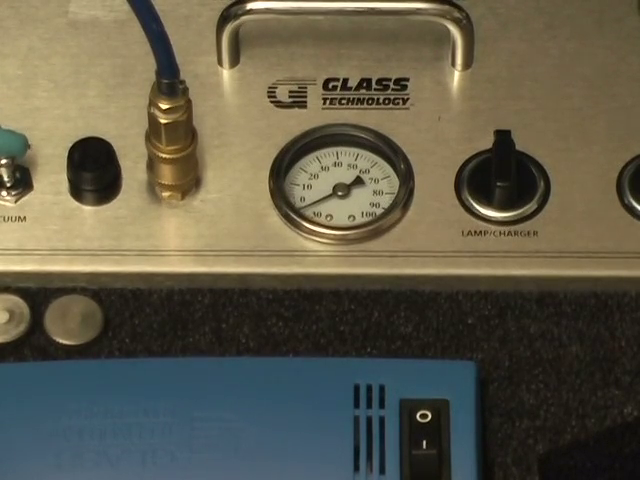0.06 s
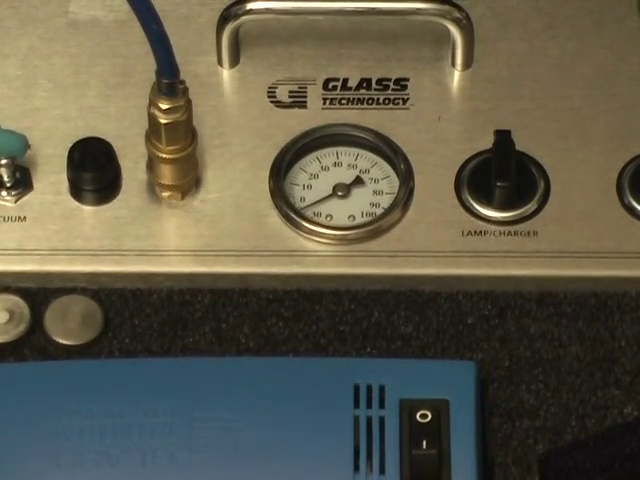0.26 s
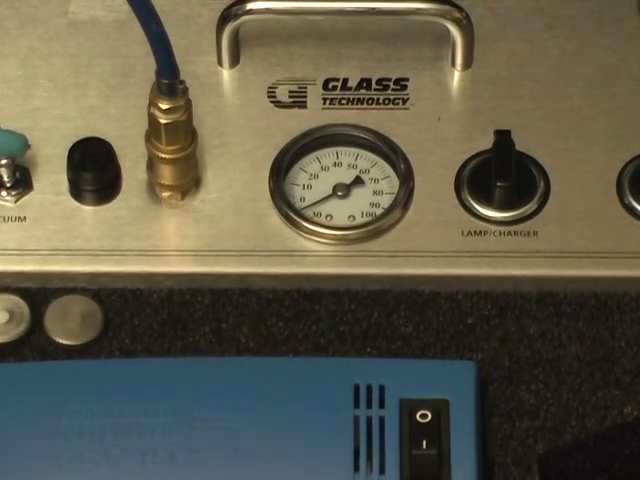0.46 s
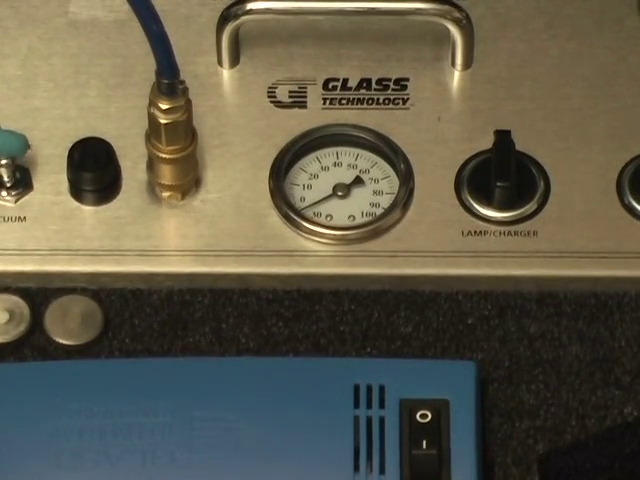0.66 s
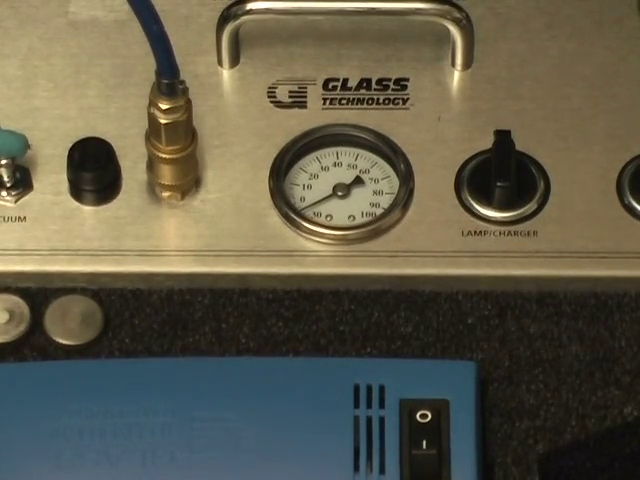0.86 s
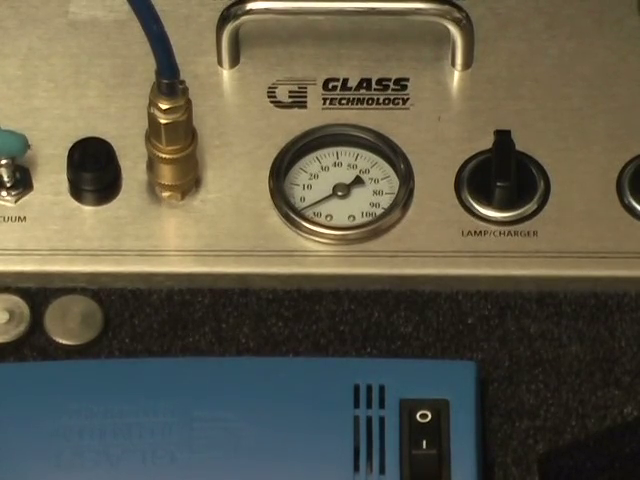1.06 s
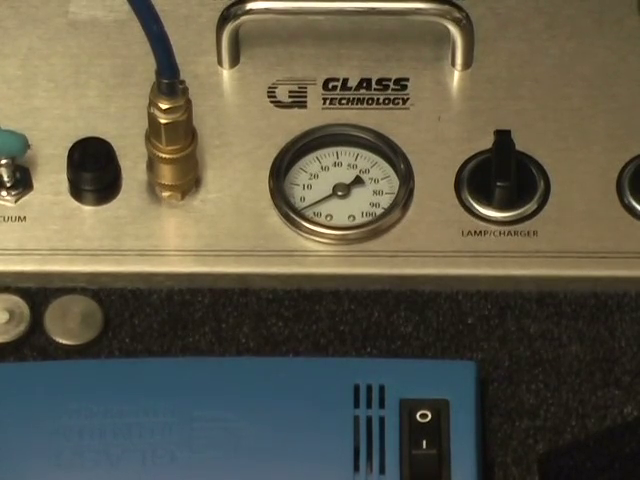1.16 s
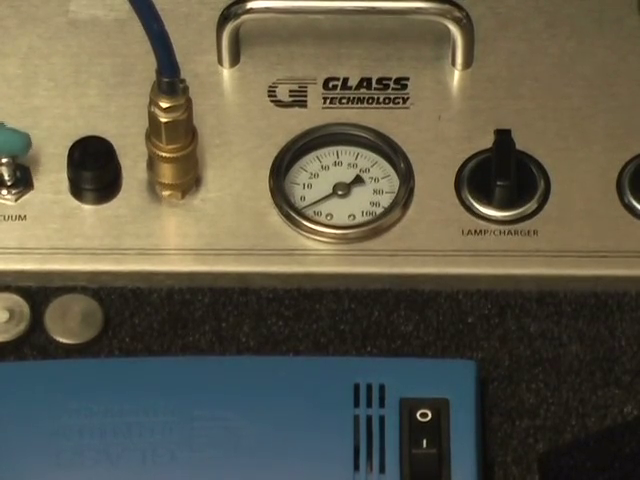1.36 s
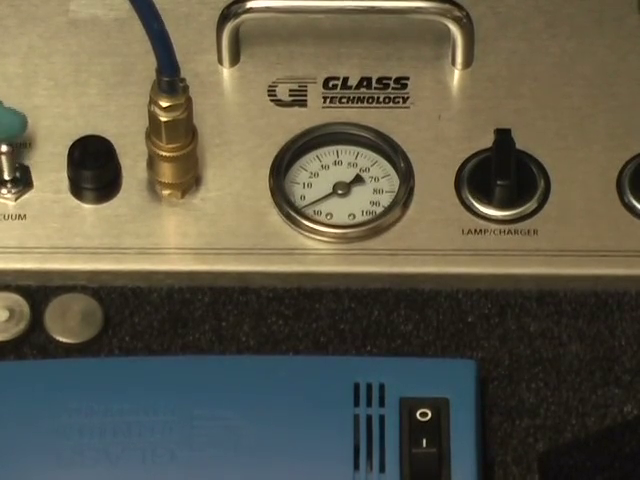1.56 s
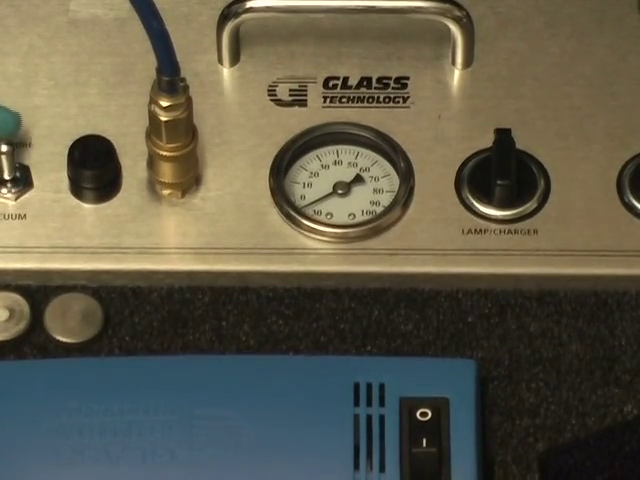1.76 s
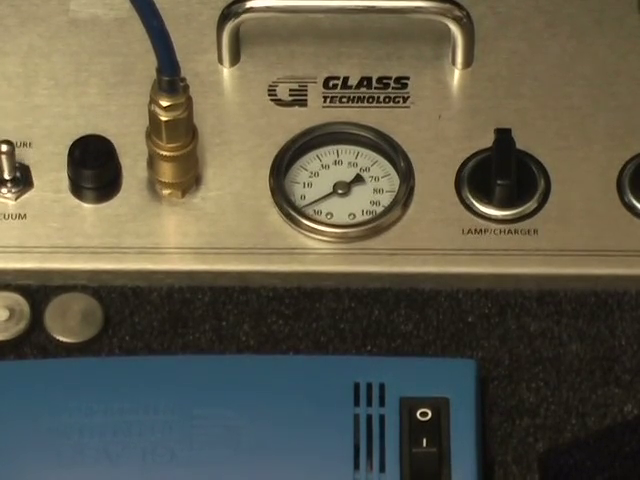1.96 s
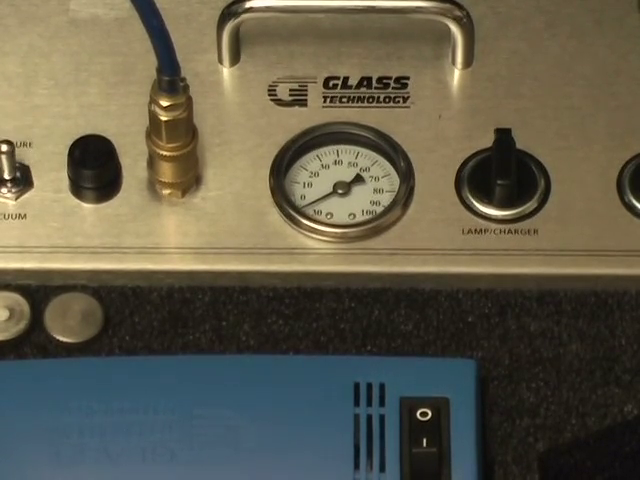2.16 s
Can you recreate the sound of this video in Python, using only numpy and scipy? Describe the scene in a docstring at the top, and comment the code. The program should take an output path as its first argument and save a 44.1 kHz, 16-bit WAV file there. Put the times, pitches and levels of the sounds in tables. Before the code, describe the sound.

A small electric vacuum pump hums close by with a fast valve clatter and thin airy hiss, until a toggle switch snaps, the motor judders to a stop, and faint fan hum remains in the room.

```python
"""A room with a small diaphragm vacuum pump in a metal case, heard from close by through two microphone ports.
Strokes hum as harmonics of the shaft; two valve slaps a turn, one weaker, ring the housing; air hisses and whistles.
A toggle switch snaps as bursts of noise over ringing panel tones. The motor coasts to rest with a judder
and a few last ticks of noise, and a hand brushes the lever.
A fan motor and mains hum, steady tones over quiet noise, remain in the room."""
import sys
import numpy as np
from scipy import signal
from scipy.fft import rfft, irfft, next_fast_len
from scipy.io import wavfile
from scipy.ndimage import map_coordinates

SR = 44100
rng = np.random.default_rng(int(sys.argv[2]) if len(sys.argv) > 2 else 0)


def dump(signal):
    """Clip the signal to [-1, 1] and save it as 16-bit WAV at the path in sys.argv[1]."""
    limited = np.clip(np.atleast_2d(signal).T, -1, 1)
    pcm = np.round(limited * 32767).astype(np.int16)
    wavfile.write(sys.argv[1], SR, pcm)


def undo_db(level):
    """Turn decibels back into plain size, where 20 dB means ten times bigger."""
    steps = np.asarray(level, float) / 20
    return 10 ** steps


N = 97240
T = np.arange(N) / SR
OFF_S = 1.426  # the switch cuts the power


def unit(x):
    """Scale to rms 1."""
    return x / np.sqrt(np.mean(x ** 2) + 1e-20)


def over_time(points):
    """Straight lines through (s, value) points."""
    return np.interp(T, *np.transpose(points))


def along(points, hz):
    """(Hz, value) points joined on a log frequency axis."""
    f, v = np.transpose(points)
    return np.interp(np.log(hz + 1), np.log(f + 1), v)


def wobble(rate):
    """A smooth random curve with rate knots a second, at most 40."""
    knots = rng.standard_normal(int(N * 40 / SR) + 4)
    return map_coordinates(knots, [T * min(rate, 40)])


def filtered(x, response):
    """x passed through a complex response of frequency."""
    m = next_fast_len(N + SR // 2)
    return irfft(rfft(x, m) * response(np.fft.rfftfreq(m, 1 / SR)), m)[..., :N]


def colour(points):
    """Zero-phase gain of a (Hz, dB) table."""
    return lambda hz: undo_db(along(points, hz))


def resonances(table):
    """Causal sum of band resonances with alternating sign."""
    def response(f):
        total = 0
        for k, (centre, width, db) in enumerate(table):
            damping = 1j * f * width
            total = total + (-1) ** k * undo_db(db) * damping / (centre * centre - f * f + damping)
        return total
    return response


def twice(table):
    """The resonances passed through twice: steeper, with each level in dB doubled."""
    return lambda f: resonances(table)(f) ** 2


def noise(response):
    """Coloured noise of rms 1."""
    return unit(filtered(rng.standard_normal(N), response))


def burst(start, t60, hold=0):
    """Envelope that jumps up, holds and dies by 60 dB in t60 seconds."""
    return (T >= start) * undo_db(-60 * np.clip(T - start - hold, 0, 1) / t60)


# steady tones of fan and mains: pitch_hz [Hz], level_db [dB rms]
HUM = [(57.3, -76.5), (120, -76), (240, -62.5), (286, -69.5), (360, -65), (401, -64), (458, -66.5),
       (516, -64.5), (573, -72.5), (1031, -74)]
# faint noise bands, passed twice: centre_hz [Hz], width_hz [Hz], level_db [relative dB]
WHINE = [(5650, 350, -6), (7550, 250, 0), (9300, 350, -7)]
# quiet room noise: pitch_hz [Hz], level_db [relative dB per Hz]
FLOOR = [(18, -41), (30, -20), (187, -6), (237, -7), (308, -21), (370, -3.5), (731, -14), (1030, -15.5),
         (1480, -20.5), (7510, -24), (15600, -34.5)]


def background():
    """Fan and mains tones waver slightly over quiet room noise."""
    waver_db, waver_rate, whine_db, floor_db = .9, 9.86, -78, -62
    hum = 0
    for hz, db in HUM:
        tone = np.sqrt(2) * np.sin(2 * np.pi * (hz * T + rng.random()))
        hum = hum + undo_db(db + waver_db * wobble(waver_rate)) * tone
    return hum + undo_db(whine_db) * noise(twice(WHINE)) + undo_db(floor_db) * noise(colour(FLOOR))


def tail(t60s):
    """A noise tail of energy 1, each frequency dying at its own speed."""
    hz, t, z = signal.stft(rng.standard_normal(SR), SR, nperseg=256)
    h = signal.istft(z * undo_db(-60 * t / along(t60s, hz)[:, None]), SR, nperseg=256)[1]
    return h / np.linalg.norm(h)


# decay of the room: pitch_hz [Hz], t60_s [s]
ROOM_DECAY = [(200, 0.76), (1000, 1), (4000, 0.58), (12000, 0.24)]
# gain of the room echo: pitch_hz [Hz], level_db [dB]
ROOM_GAIN = [(60, -28), (300, -25), (700, -19), (1500, -16), (4000, -12), (12000, -14)]


def room_echo(machine):
    """Reflections of the machine as a noise tail, already sounding at the start."""
    lead_in = np.concatenate([machine[SR // 2::-1], machine])  # the first half second reversed, ahead
    echo = signal.fftconvolve(lead_in, tail(ROOM_DECAY))[SR // 2 + 1:][:N]
    return filtered(echo, colour(ROOM_GAIN))


# brushes of the hand on the lever: start_s [s], level_db [dB at the peak], hold_s [s]
BRUSHES = [(1.826, -66, 0.0071), (1.840, -54.5, .002), (1.8435, -56.5, 0.0036), (1.850, -67, 0.0074),
           (1.863, -64, 0.0018), (1.91, -49, 0.001), (1.916, -65, 0.0087), (1.93, -65, 0.0034),
           (1.936, -56, 0.0034)]
# colour of the brushes: pitch_hz [Hz], level_db [relative dB per Hz]
BRUSH = [(880, -44), (1500, -3), (2780, -9), (5980, 1), (7280, -3), (9120, -1), (15600, -16)]


def hand():
    """The hand brushes the lever: short held bursts of friction noise."""
    fade_t60 = .016  # s
    envelope = sum(undo_db(db) * burst(s, fade_t60, hold) for s, db, hold in BRUSHES)
    return envelope * noise(colour(BRUSH))


# last ticks of the coasting pump: start_s [s], level_db [dB at the peak]
TICKS = [(1.5165, -44), (1.5465, -47), (1.549, -43), (1.5815, -55), (1.640, -50.5), (1.692, -51),
         (1.7737, -60)]
# colour of the ticks: pitch_hz [Hz], level_db [relative dB per Hz]
TICK = [(500, -50), (1000, 0), (2200, 5), (4000, -1), (6100, 4), (7700, -25), (9700, -3), (12000, -20),
        (15600, -32)]


def last_ticks():
    """Small ticks of the coasting pump: sharp bursts of noise that die fast."""
    tick_t60 = .025  # s
    return sum(undo_db(db) * burst(s, tick_t60) for s, db in TICKS) * noise(colour(TICK))


# contacts of the toggle: start_s [s], level_db [dB at the peak]
CONTACTS = [(1.4257, -33), (1.4273, -31), (1.429, -33), (1.4309, -30), (1.436, -37)]
# colour of the snap: pitch_hz [Hz], level_db [relative dB per Hz]
SNAP = [(290, -23), (500, -4), (1780, -8), (2820, -3), (3870, -12.5), (5080, 2.5), (7180, -6),
        (12400, -10.5), (15600, -10)]
# ringing of the panel: pitch_hz [Hz], level_db [relative dB], t60_s [s]
PANEL = [(988, -5, 0.15), (1027, -1, 0.17), (1450, -3, 0.18), (2832, 5, 0.05), (4370, 4, 0.035),
         (5367, 3.5, 0.047)]
# the case ringing on, passed twice: centre_hz [Hz], width_hz [Hz], level_db [relative dB]
AFTER = [(4750, 200, -4), (5320, 150, -2), (5760, 200, 0)]
# one faint high ping: start_s [s], pitch_hz [Hz], level_db [dB at the peak], t60_s [s]
PING = (1.507, 14500, -66, .08)


def switch():
    """The toggle snaps over in several contacts, rings the panel, and the case rings on."""
    contact_t60, snap_t60, snap_hold, after_t60 = .009, .13, .0075, .3  # s
    snap_db, panel_db, after_db = -40.5, -41, -48
    contacts = sum(undo_db(db) * burst(s, contact_t60) for s, db in CONTACTS)
    body = undo_db(snap_db) * burst(OFF_S, snap_t60, snap_hold)
    snap = (contacts + body) * noise(colour(SNAP))
    panel = sum(undo_db(db) * burst(OFF_S, t60) * np.sin(2 * np.pi * hz * T) for hz, db, t60 in PANEL)
    after = undo_db(after_db) * burst(OFF_S, after_t60) * noise(twice(AFTER))
    s, hz, db, t60 = PING
    ping = undo_db(db) * burst(s, t60) * np.sin(2 * np.pi * hz * T)
    return snap + undo_db(panel_db) * panel + after + ping


# shaft speed under power: start_s [s], speed_hz [turns per second]
SPEED = [(0, 67.43), (.2, 67.45), (.45, 67.68), (1.43, 67.72)]


def shaft():
    """Share of full speed, braking late to rest, and turns counted from one valve slap."""
    slap_at_s, coast_s, late_braking = .845, .26, 2.2
    share = 1 - np.clip((T - OFF_S) / coast_s, 0, 1) ** late_braking
    turns = np.cumsum(share * over_time(SPEED)) / SR
    return share, turns - turns[round(slap_at_s * SR)]


# air through the valves: pitch_hz [Hz], level_db [relative dB per Hz]
AIR = [(24, -63), (40, -23), (150, -25), (203, -10), (343, -2.5), (429, -9), (1920, -17), (2290, -22),
       (3400, -18.5), (3950, -20.5), (4500, -17), (5210, -18), (6050, -16), (8500, -21), (11300, -28),
       (12200, -37), (15600, -39)]
# air whistling in the valve, passed twice: centre_hz [Hz], width_hz [Hz], level_db [relative dB]
WHISTLE = [(5750, 450, -14), (6250, 200, -11), (7850, 200, -18)]
# added level of the whistle: start_s [s], level_db [dB]
WHISTLE_SWELL = [(0, -0.5), (.4, 2.1), (1, 1), (1.3, 4), (1.45, 5)]
# thin tones in the whistle: pitch_hz [Hz], level_db [dB at the peak, before swell and pulse]
PIPE = [(6196, -59), (6214, -60), (6285, -63)]


def valve_air(share, turns):
    """Air hisses and whistles through the valves, pulsing once a turn and falling with the speed."""
    whistle_db, whistle_pulse_db, pipe_pulse_db, pipe_waver_db = -53.5, 5, 5, 2
    air_db, air_pulse_db, speed_power = -46.5, -.5, 16
    beat = np.cos(2 * np.pi * (turns - .08))
    swell_db = over_time(WHISTLE_SWELL)
    whistle = undo_db(whistle_db + swell_db + whistle_pulse_db * beat) * noise(twice(WHISTLE))
    pipe = 0
    for hz, db in PIPE:
        tone = np.sin(2 * np.pi * (hz * T + .2 * wobble(15)))  # pitch wanders slightly
        pipe = pipe + undo_db(db + pipe_waver_db * wobble(8)) * tone
    pipe = undo_db(swell_db + pipe_pulse_db * beat) * pipe
    air = undo_db(air_db + air_pulse_db * beat) * noise(colour(AIR))
    return share ** speed_power * (whistle + pipe + air)


# force of the valve slap: start_s [s], ring_db [dB before a trim], seat_db [dB before a trim]
SLAP = [(0, -58, -60), (.15, -58, -59), (.19, -54.5, -58), (.5, -53.5, -57), (.85, -54.5, -56),
        (1.1, -55.5, -55), (1.25, -57, -54.5), (1.42, -56.5, -55.5)]
# colour of the bright ring: pitch_hz [Hz], level_db [relative dB]
SLAP_COLOUR = [(2150, -13), (2600, 18), (4000, -14.5), (6000, -7), (8000, -3.5), (11000, -4), (13500, -17),
               (16000, -43)]
# valve housing resonances: centre_hz [Hz], width_hz [Hz], level_db [relative dB]
HOUSING = [(4750, 240, 3.5), (6400, 310, 2.5), (7350, 350, 0), (8290, 330, 3.5), (10100, 520, -1.5),
           (11240, 550, -4.5), (13500, 610, -2)]
# valve seat, passed twice: centre_hz [Hz], width_hz [Hz], level_db [relative dB]
SEAT = [(3320, 740, -5), (3710, 390, -5.5)]
# part rung evenly by each slap, passed twice: centre_hz [Hz], width_hz [Hz], level_db [relative dB]
COLLAR = [(5850, 300, 0)]


def valve_slaps(share, turns):
    """Two slaps a turn, as noise bursts and one click, ring the housing and the duller seat."""
    slap_t60, tail_t60, tail_db = .01, .05, -19  # s, s, dB
    second_turn, second_db = .42, -7  # the weaker slap
    evenness_db, jitter_s, speed_power = 1.1, .00003, 37
    knock_db, ring_trim_db, seat_trim_db, collar_db = 6, 4, -1.1, -62
    whole = np.floor(turns).astype(int)
    chance = rng.standard_normal((200, 3))[whole + 80]  # drawn anew each turn
    size = undo_db(evenness_db * chance)
    age, second_age = np.array([turns % 1, (turns - second_turn) % 1]) / SPEED[-1][1]  # s at full speed
    first = undo_db(-60 * age / slap_t60) + undo_db(tail_db - 60 * age / tail_t60)
    second = undo_db(second_db - 60 * second_age / slap_t60)
    gate = size[:, 0] * first + size[:, 1] * second

    hits = np.flatnonzero(np.diff(whole, prepend=whole[0]))
    jittered = np.abs(hits + np.round(jitter_s * SR * chance[hits, 2])).astype(int)
    knock = np.bincount(jittered, size[hits, 0], N)[:N]
    force = unit(gate * rng.standard_normal(N)) + undo_db(knock_db) * unit(knock)

    s, ring_db, seat_db = np.transpose(SLAP)
    ring = unit(filtered(force, lambda f: resonances(HOUSING)(f) * colour(SLAP_COLOUR)(f)))
    ring = ring * undo_db(np.interp(T, s, ring_db) + ring_trim_db)
    seat = unit(filtered(force, twice(SEAT))) * undo_db(np.interp(T, s, seat_db) + seat_trim_db)
    even = np.bincount(hits, size[hits, 2], N)
    collar = undo_db(collar_db) * unit(filtered(even, twice(COLLAR)))
    return share ** speed_power * (ring + seat + collar)


# shaft orders at full speed: order [multiple of shaft speed], level_db [relative dB]
STROKE = [(1, -19.5), (2, -19), (3, -1), (4, -2.5), (5, -3.5), (6, -17), (7, -13), (8, -12), (9, -20.5),
          (10, -18), (11, -14.5), (12, -22), (13, -12), (14, -13), (15, -23), (16, -14.5), (17, -21.5),
          (18, -27), (19, -14), (20, -17), (21, -21), (22, -23), (23, -27), (24, -23), (25, -21), (26, -34),
          (27, -19), (28, -36), (29, -31), (30, -17), (31, -33), (32, -23.5), (33, -38)]
# orders that differ before the vacuum settles: order [multiple of shaft speed], level_db [added dB]
EARLY = [(6, 3), (7, 4), (8, -3), (10, 4), (11, -5), (17, 4), (19, 2), (20, 6), (21, 4), (27, -13)]
# stroke force while coasting: start_s [s], level_db [dB under full load]
COASTING = [(1.42, 0), (1.475, -1.5), (1.5, -6), (1.54, -15), (1.58, -17), (1.63, -25), (1.7, -36)]
# buzz of the case, passed twice: centre_hz [Hz], width_hz [Hz], level_db [relative dB]
RATTLE = [(365, 29, 3), (224, 13, 1)]
# rough shaking after switch-off: pitch_hz [Hz], level_db [relative dB per Hz]
JUDDER = [(40, -24), (70, -3), (160, -13), (350, 4.5), (1000, -8), (2200, -13), (5000, -37)]


def order_lag(k):
    """Phase of an order in turns: the low ones lock into a thump, the highest fall at random."""
    if k <= 5:
        return .115 * k * k
    if k <= 21:
        return .102 * k * k + .44 * k + .21
    return rng.random()


def strokes(share, turns):
    """Shaft orders; while coasting they slide through the fixed response of the case, which buzzes and judders."""
    stroke_db, stroke_turn, settle_s = -40, .519, .5
    waver_db, waver_rate, coast_waver_db, break_up_s = .74, 13.8, 3, .07
    buzz_db, judder_db, judder_t60, judder_hold, judder_rise = -52.5, -43.5, .81, .073, .03  # dB, then s
    order, order_db = np.transpose(STROKE)
    early = dict(EARLY)
    waver = waver_db + coast_waver_db * np.clip((T - OFF_S) / break_up_s, 0, 1)
    unsettled = np.clip(1.5 - 1.5 * T / settle_s, 0, 1)
    tones = 0
    for k in range(1, 60):
        case_db = np.interp(k * share, order, order_db)
        level_db = case_db + early.get(k, 0) * unsettled + waver * wobble(waver_rate)
        tones = tones + undo_db(level_db) * np.cos(2 * np.pi * (k * (turns - stroke_turn) + order_lag(k)))
    hum = -undo_db(stroke_db) * np.sqrt(2) * tones
    buzz = undo_db(buzz_db + 2.0 * wobble(12.1)) * noise(twice(RATTLE))
    rise = np.clip((T - OFF_S) / judder_rise, 0, 1) * burst(OFF_S, judder_t60, judder_hold)
    judder = undo_db(judder_db + 1.5 * wobble(34.86)) * rise * noise(colour(JUDDER))
    return undo_db(over_time(COASTING)) * (buzz + hum) + judder


# side under mid, a quarter cycle apart: pitch_hz [Hz], level_db [dB]
WIDTH = [(60, -21), (180, -26.5), (330, -25), (550, -18), (1650, -19.5), (4970, -18), (15000, -15)]
# scattered sound, unlike in the two ports: pitch_hz [Hz], level_db [dB]
SPREAD = [(60, -39), (300, -29), (1000, -26), (4000, -18), (9000, -21), (14000, -5)]
# noise unlike in the two ports: pitch_hz [Hz], level_db [relative dB per Hz]
HISS = [(18, -66), (30, -31), (152, 0), (308, -16), (520, -1), (625, -11), (15600, -30)]
# first port over the second: pitch_hz [Hz], level_db [dB]
LEAN = [(60, -.7), (240, 0.1), (950, .3), (3770, -.5), (15000, .5)]


def microphone_ports(mid):
    """Two close ports hear the sound a phase step apart, with scatter and hiss of opposite sign."""
    hiss_db = -65
    scatter = signal.fftconvolve(mid, tail([(100, 0.45)]))[:N]  # t60 0.45 s at every frequency
    side = filtered(mid, lambda hz: 1j * colour(WIDTH)(hz)) + filtered(scatter, colour(SPREAD))
    side = side + undo_db(hiss_db) * noise(colour(HISS))
    return filtered(np.array([mid + side, mid - side]), lambda hz: undo_db(along(LEAN, hz) * [[.5], [-.5]]))


def scene():
    """The machine and its room at the two microphone ports."""
    share, turns = shaft()
    pump = strokes(share, turns) + valve_slaps(share, turns) + valve_air(share, turns)
    machine = pump + switch() + last_ticks() + hand()
    return microphone_ports(background() + room_echo(machine) + machine)


def band_limit(x):
    """A steep low-pass at the top of the band."""
    return signal.sosfilt(signal.butter(12, 15790, fs=SR, output="sos"), x)


def record(dry):
    """Nothing from 15.8 kHz up is kept."""
    mix = filtered(dry, lambda hz: hz < 15800)
    return band_limit(mix)


dry = scene()
out = record(dry)
dump(out)
```